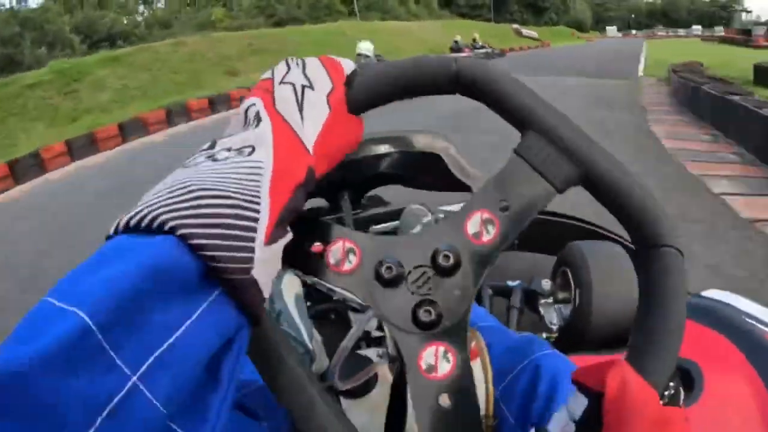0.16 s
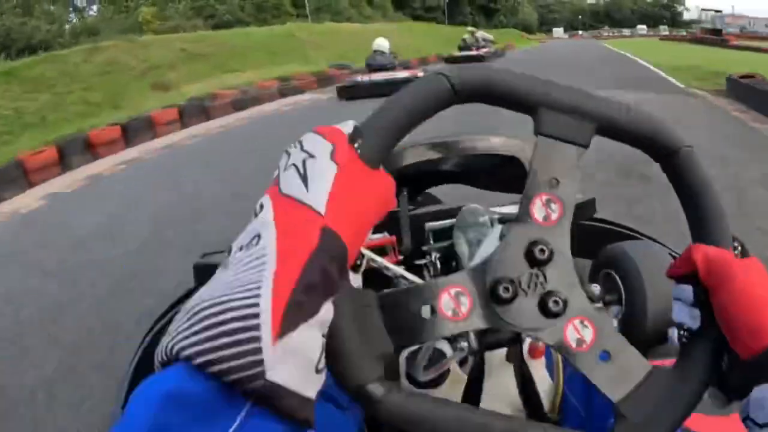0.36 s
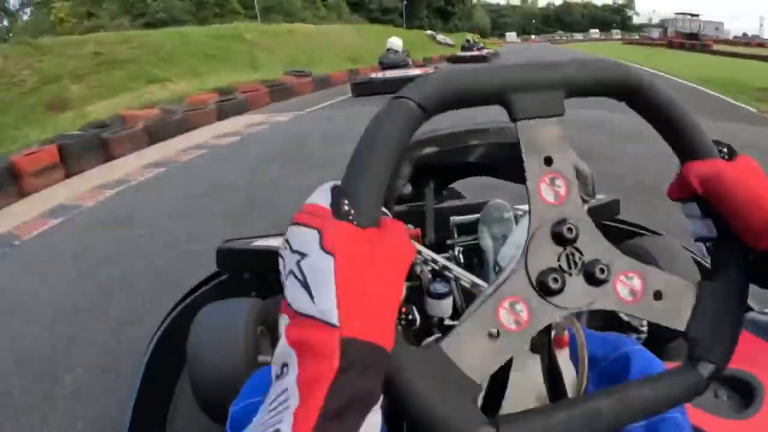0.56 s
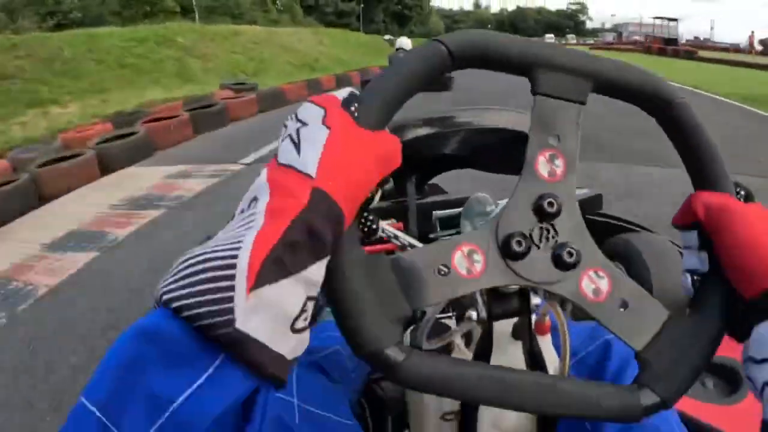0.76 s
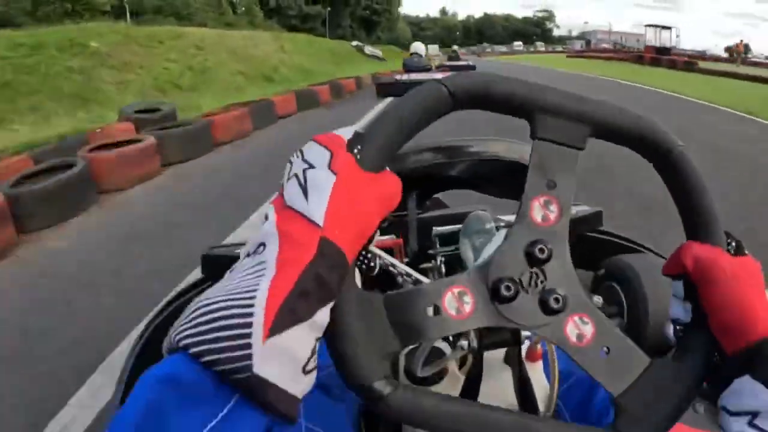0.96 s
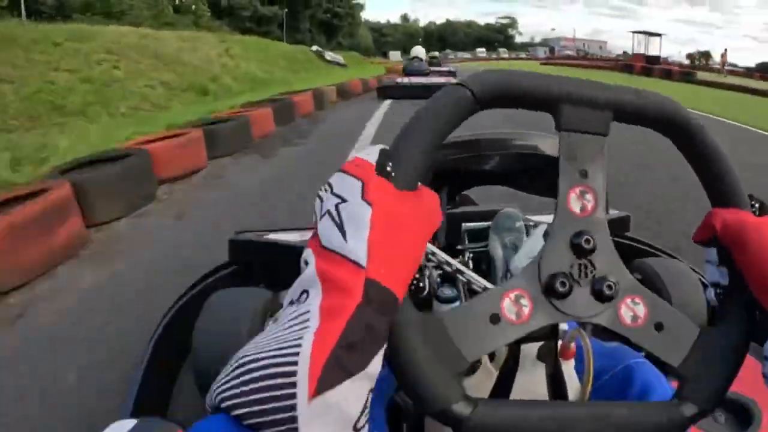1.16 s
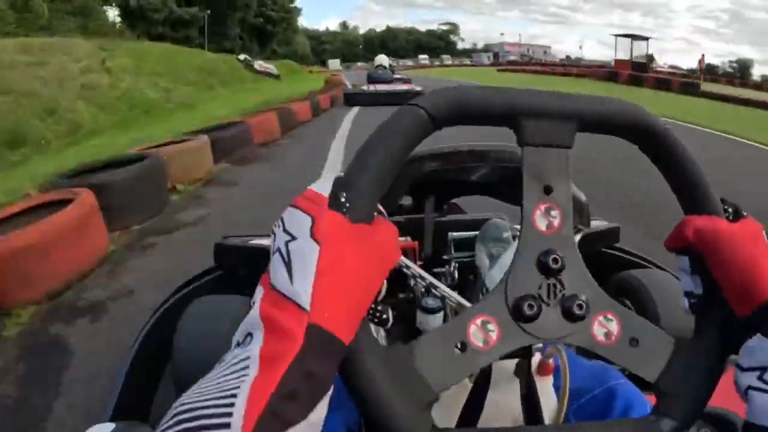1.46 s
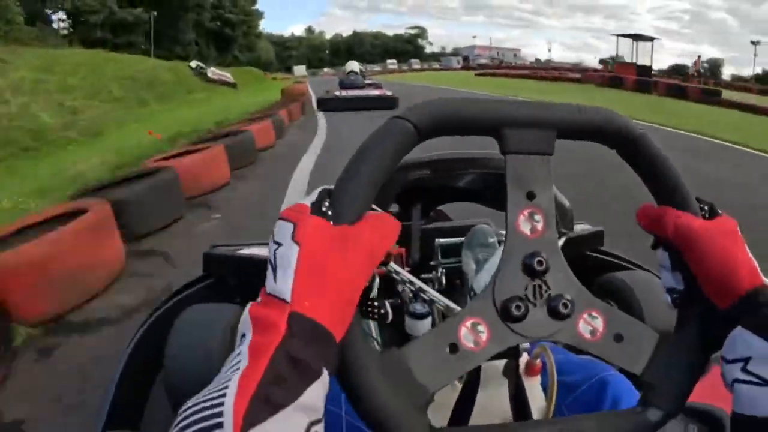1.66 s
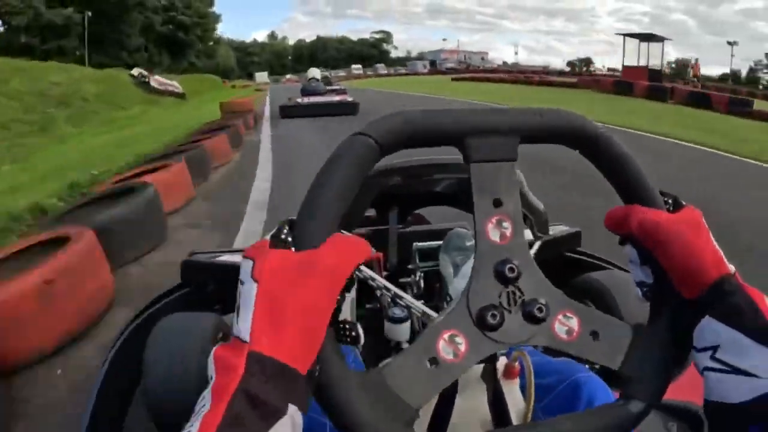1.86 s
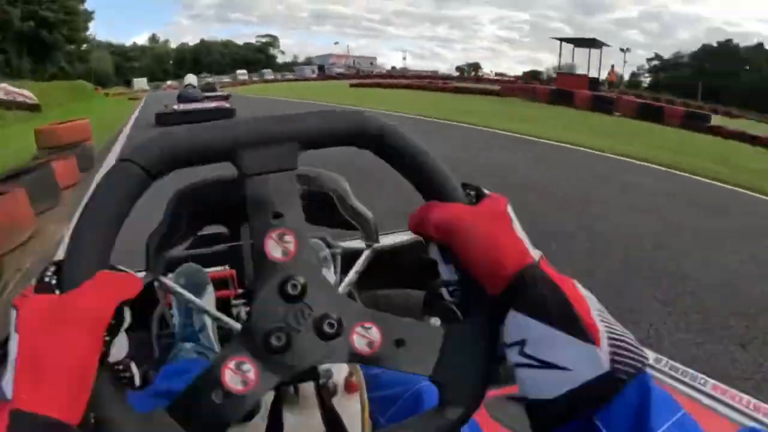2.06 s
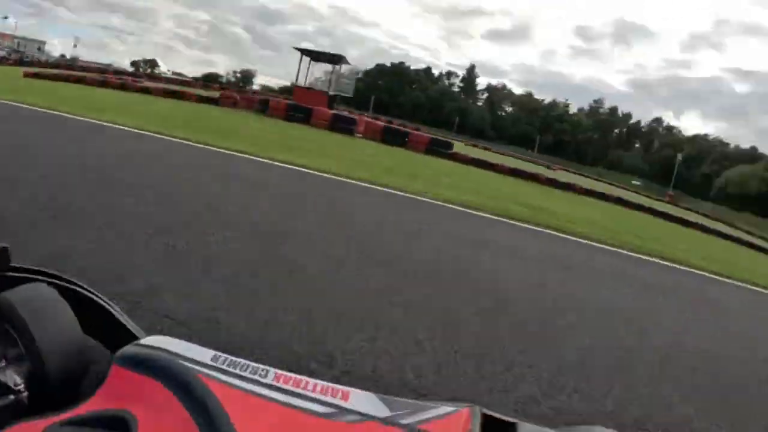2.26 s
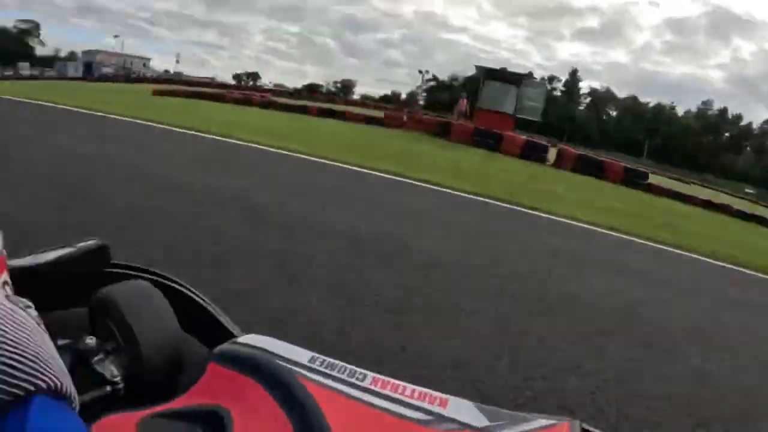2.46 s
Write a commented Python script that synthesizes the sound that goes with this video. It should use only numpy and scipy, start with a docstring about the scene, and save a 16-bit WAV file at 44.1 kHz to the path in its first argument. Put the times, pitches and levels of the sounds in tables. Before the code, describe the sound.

A small single-cylinder kart engine drones roughly from the driver's seat, with chain whirr and rattles.

```python
"""A single-cylinder four-stroke kart heard from the seat: speed hunts through a bend, climbs on the straight.
Each firing is a bark with a puff of gas, then a thump: partials locked to the cycle, plus gated noise.
The chain whirrs as tones in step with the engine; wind, rumble, hiss and tyre scrub are coloured noise.
The suit swishes as gliding noise bands, the bodywork rattles as decaying noise bursts, and the air
buffets the microphone as low gliding swings."""
import sys
import numpy as np
from scipy import signal
from scipy.fft import rfft, irfft
from scipy.io import wavfile
from scipy.ndimage import uniform_filter1d

SR = 44100
rng = np.random.default_rng(int(sys.argv[2]) if len(sys.argv) > 2 else 0)


def wav_record(signal):
    """Record a signal, one row per channel, as 16-bit PCM in the file named by sys.argv[1]."""
    frames = np.transpose(np.atleast_2d(signal))
    bounded = np.clip(frames, -1, 1)
    # unit amplitude maps onto the largest positive 16-bit level
    quanta = np.round(bounded * 32767).astype(np.int16)
    wavfile.write(sys.argv[1], SR, quanta)


N = 114660
TIME_S = np.arange(N) / SR

# Spectrum levels are relative: noise() scales each to unit rms.
# Engine speed. Each row: time in seconds, firings per second.
FIRING_RATE_HZ = [(0.0, 31.5), (0.073, 30.3), (0.241, 33.14), (0.306, 31.07), (0.428, 33.03),
                  (0.507, 30.75), (0.573, 32.84), (0.658, 29.81), (0.726, 32.05), (0.793, 29.77),
                  (0.912, 31.4), (0.977, 29.69), (1.032, 30.97), (1.218, 31.46), (1.262, 30.73),
                  (1.324, 31.55), (1.424, 30.62), (1.513, 31.89), (1.57, 31.15), (1.719, 31.44),
                  (1.838, 31.65), (1.99, 32.1), (2.095, 32.29), (2.241, 32.79), (2.427, 33.28),
                  (2.6, 33.45)]
# Exhaust partials before load, pipe and trim. Each row: multiple of the firing rate, level in dB.
THUMP_PARTIALS = [(2, -39.5), (3, -47), (4, -45), (5, -46), (6, -42), (7, -44), (8, -49), (9, -55),
                  (10, -53), (11, -51.5), (12, -46.3)]
BARK_PARTIALS = [(13, -52), (14, -53.5), (15, -46.5), (16, -54.5), (17, -55), (18, -58), (19, -62),
                 (20, -61)]
# Exhaust pipe resonances and notches. Each row: centre in Hz, half width in Hz, lift in dB.
PIPE_MODES = [(184.5, 9.6, 4), (202, 4, -7), (229, 7, 3), (365, 22, 3.5), (386, 6, 3), (402, 9, -10),
              (494, 16, 4)]
# Exhaust pulse strength with load. Each row: time in seconds, gain in dB.
LOAD_DB = [(0, -0.5), (.35, 2.5), (.8, 0.5), (1.2, 1.5), (1.8, 1.7), (2.3, 1.4), (2.6, -0.5)]
# Gas rush spectrum. Each row: frequency in Hz, density in dB per Hz.
PUFF_SPECTRUM = [(100, -20.5), (200, -1.5), (330, 1.5), (450, -4.5), (560, -7), (750, -11.5), (1500, -36)]
THUMP_AT_CYCLE, BARK_AT_CYCLE, PUFF_AT_CYCLE = 0.97, 0.906, 0.88
THUMP_TRIM_DB, BARK_TRIM_DB, PUFF_DB = 0.3, 0, -48
THUMP_ROUGH_DB, BARK_ROUGH_DB, WAVER_DB = 0.4, 0.7, 0.4
PUFF_WIDTH_CYCLES = 0.085

# Main chain mesh tone with tension. Each row: time in seconds, level in dB.
MESH_LEVEL_DB = [(0, -45.5), (.26, -45), (.37, -53), (.48, -45), (.63, -44), (.76, -48), (.94, -43.5),
                 (1.03, -49), (1.25, -44.5), (1.5, -45), (1.72, -43.5), (1.88, -50), (2.1, -55),
                 (2.31, -41.5), (2.45, -48), (2.6, -50)]
# Mesh sidebands, and the buzz an octave above. Each row: multiple of the firing rate, level in dB.
SIDEBANDS = [(25, -54), (26, -59.5), (27, -54), (29, -53), (30, -52), (31, -58.5)]
OCTAVE_LINES = [(52, -65), (53, -66), (54, -66), (55, -60.5), (56, -57.5), (57, -65)]
# Gains on the sidebands and on the buzz. Each row: time in seconds, gain in dB.
SIDEBAND_GAIN_DB = [(0, -3.5), (.5, -1.5), (.9, 1.5), (1.4, -0.5), (1.75, 1.5), (2.1, -2), (2.3, 4.5),
                    (2.47, 5.5), (2.6, 2.5)]
OCTAVE_GAIN_DB = [(0, -3), (.7, -.5), (1.8, 1), (2.05, 0), (2.25, -7), (2.6, -7)]
MESH_ORDER = 28
CHAIN_SLIP_RAD, CHAIN_OWN_SLIP_RAD, CHAIN_SLIP_HZ = 0.2, 0.6, 5

# Spectra of air on the microphone, frame rumble, rolling and mechanical hiss, tyre scrub.
# Each row: frequency in Hz, density in dB per Hz.
WIND_SPECTRUM = [(15, -4), (25, -5), (55, -3), (85, -3), (120, -6.5), (190, -2.5), (240, -8), (290, -14),
                 (450, -37)]
RUMBLE_SPECTRUM = [(150, -12.5), (290, -3), (380, 1.5), (500, -3), (690, -9.5), (880, -7.5), (1100, -14.5),
                   (1600, -22), (3000, -38.5)]
HISS_SPECTRUM = [(500, -7.5), (1000, 1.5), (1400, 2), (1750, -1), (2000, -5), (2300, -4.5), (2600, -17),
                 (3800, -12), (4400, -21), (4800, -16), (5500, -22), (6700, -25.5), (7500, -21),
                 (8500, -24.5), (9500, -34), (11500, -40), (13500, -47)]
SCRUB_SPECTRUM = [(600, -28), (1200, 0.5), (2000, -2), (3200, -5.5), (4500, -13), (8000, -23.5),
                  (10000, -33.5), (13000, -46.5)]
# Levels of wind, rumble and scrub. Each row: time in seconds, level in dB.
WIND_LEVEL_DB = [(0, -32), (.3, -33.5), (.55, -34), (.9, -34), (1.15, -33), (1.5, -35), (1.58, -37),
                 (1.7, -37), (1.85, -34), (1.93, -39), (2.15, -36.5), (2.35, -32.5), (2.46, -33.5),
                 (2.6, -37.5)]
RUMBLE_LEVEL_DB = [(0, -36.5), (.2, -36), (.6, -41.5), (1.2, -37.5), (1.48, -39.5), (1.7, -38.5),
                   (2.15, -40), (2.35, -36), (2.6, -37.5)]
SCRUB_LEVEL_DB = [(0, -42), (.06, -58.5), (.11, -48.5), (.17, -49), (.21, -52.5), (.28, -49.5), (.33, -53),
                  (.39, -53.5), (.48, -51), (.56, -56), (.64, -50), (.73, -57), (.88, -52), (1.0, -58),
                  (1.08, -53.5), (1.2, -54), (1.27, -60.5), (1.52, -53), (1.6, -57), (2.1, -57),
                  (2.34, -55.5), (2.395, -52.5), (2.425, -58), (2.5, -54.5), (2.55, -53), (2.6, -56)]
HISS_DB = -50.5

# Suit swishes. Each row: centre in seconds, level in dB, frequency in Hz, glide in Hz per second,
# Gaussian width in seconds, half bandwidth in Hz.
SWISHES = [(.025, -64.5, 7400, -5, 0.037, 900), (.107, -52.5, 2775, -5000, 0.043, 600),
           (.165, -48.5, 1600, -6000, 0.028, 450), (.265, -63, 6000, 0, 0.023, 1600),
           (.295, -55.5, 3200, 0, 0.023, 554), (0.476, -50, 2113, 12000, .02, 900),
           (2.395, -47, 2850, 30000, 0.011, 700), (2.544, -49.5, 2500, 15002, 0.017, 800)]
SWISH_RASP_DB, SWISH_RASP_HZ = 1.7, 160

# Bodywork knocks. Each row: start in seconds, level in dB, 60 dB ring time in seconds,
# brightness tilt in dB per octave.
KNOCKS = [(0.175, -44, .025, -2), (.184, -37, 0.025, -3.5), (0.495, -42, 0.021, 1), (.946, -44, .03, -9),
          (1.199, -51.5, .04, 10.5), (1.458, -56, .035, 12), (2.058, -39.5, .035, -8),
          (2.179, -37.5, .05, -8), (2.433, -40, .018, 4), (2.445, -29.5, .016, -6), (2.452, -39, 0.03, -1),
          (2.484, -42, .025, -3)]
# Knock spectrum before tilt. Each row: frequency in Hz, density in dB per Hz.
KNOCK_SPECTRUM = [(300, -19.5), (800, -3), (1600, 5), (2600, 0.5), (4500, -10.5), (8000, -30.5),
                  (10000, -39), (13000, -65)]
KNOCK_ATTACK_S = 0.0008

# Air buffets. Each row: centre in seconds, level in dB, frequency in Hz, glide in Hz per second,
# Gaussian width in seconds.
BUFFETS = [(1.29, -28.5, 41.7, -6, 0.033), (1.48, -22.5, 52, 1, 0.019), (1.27, -33.5, 142, -450, 0.046),
           (1.5, -38, 139.5, -400, 0.049), (1.66, -29.5, 113.3, -300, 0.035),
           (2.03, -33, 140.3, -500, 0.055), (2.35, -32, 90.3, 194, 0.057)]

STOPBAND_HZ, FADE_S, CEILING = 13700, 0.003, 0.14


def from_db(db):
    """Decibels to gain."""
    return 10 ** (np.asarray(db) / 20)


def rms_one(x):
    """Scale to unit rms."""
    return x / np.sqrt(np.mean(x ** 2) + 1e-20)


def in_time(rows):
    """Join (seconds, value) rows by straight lines."""
    return np.interp(TIME_S, *np.transpose(rows))


def drift(rate_hz):
    """Slow random wander of unit rms: two-pole lowpassed noise, computed every 40 samples."""
    step = 40
    pole = np.exp(-2 * np.pi * rate_hz * step / SR)
    white = rng.standard_normal(N // step + 2002)
    slow = signal.lfilter([1], [1, -2 * pole, pole * pole], white)[2000:]  # drop the settling
    return np.interp(np.arange(N) / step, np.arange(len(slow)), rms_one(slow))


def noise(spectrum):
    """Unit-rms noise of the given colour, falling 12 dB per octave beyond both ends."""
    hz, db = np.transpose(spectrum)
    f = np.maximum(np.fft.rfftfreq(N, 1 / SR), 1)
    colour = from_db(np.interp(np.log(f), np.log(hz), db))
    skirts = np.minimum(1, np.minimum(f / hz[0], hz[-1] / f)) ** 2
    return rms_one(irfft(rfft(rng.standard_normal(N)) * colour * skirts, N))


def pulses(turns, rate_hz, partials, rough_db):
    """One pressure dip per cycle, each of its own strength; partials waver and swell on pipe resonances."""
    cycle = np.floor(turns + 0.5).astype(int) + 2
    strength = from_db(rough_db * rng.standard_normal(size=128)[cycle])
    wave = 0
    for order, db in partials:
        pipe_db = sum(lift_db / (1 + ((order * rate_hz - hz) / half_width_hz) ** 2)
                      for hz, half_width_hz, lift_db in PIPE_MODES)
        gain = from_db(db + pipe_db + WAVER_DB * drift(0.77))
        wave = wave + gain * np.cos(2 * np.pi * round(order) * turns)
    return -np.sqrt(2) * wave * uniform_filter1d(strength, size=256)  # no steps between cycles


def engine(turns, rate_hz):
    """Every firing: a bark with a puff of gas, then the low thump, all scaled by load."""
    thump = pulses(turns - THUMP_AT_CYCLE, rate_hz, THUMP_PARTIALS, THUMP_ROUGH_DB)
    bark = pulses(turns - BARK_AT_CYCLE, rate_hz, BARK_PARTIALS, BARK_ROUGH_DB)
    from_puff_cycles = (turns - PUFF_AT_CYCLE + 0.5) % 1 - 0.5
    valve = np.exp(-0.5 * (from_puff_cycles / PUFF_WIDTH_CYCLES) ** 2)
    puff = rms_one(valve * noise(PUFF_SPECTRUM))
    exhaust = from_db(THUMP_TRIM_DB) * thump + from_db(BARK_TRIM_DB) * bark + from_db(PUFF_DB) * puff
    return from_db(in_time(LOAD_DB)) * exhaust


def chain_lines(turns, lines, shared_slip_rad):
    """Tones in step with the engine; each phase follows the shared slip and a wander of its own."""
    out = 0
    for order, db in lines:
        phase = 2 * np.pi * (round(order) * turns + rng.random())
        own_slip_rad = CHAIN_OWN_SLIP_RAD * drift(CHAIN_SLIP_HZ)
        out = out + from_db(db) * np.cos(phase + shared_slip_rad + own_slip_rad)
    return out


def chain(turns):
    """Links meet the sprocket in step with the engine: a clear tone, wavering sidebands, an octave buzz."""
    slip_rad = CHAIN_SLIP_RAD * drift(CHAIN_SLIP_HZ)
    mesh = from_db(in_time(MESH_LEVEL_DB)) * np.cos(2 * np.pi * MESH_ORDER * turns + slip_rad)
    whirr = from_db(in_time(SIDEBAND_GAIN_DB)) * chain_lines(turns, SIDEBANDS, slip_rad)
    buzz = from_db(in_time(OCTAVE_GAIN_DB)) * chain_lines(turns, OCTAVE_LINES, 2 * slip_rad)
    flutter = from_db(0.7 * drift(12))
    return np.sqrt(2) * (mesh + whirr + buzz) * flutter


def rolling():
    """Wind, frame rumble, steady hiss and the grainy scrub of the tyres, as coloured noise."""
    wind = from_db(in_time(WIND_LEVEL_DB)) * noise(WIND_SPECTRUM)
    rumble = from_db(in_time(RUMBLE_LEVEL_DB)) * noise(RUMBLE_SPECTRUM)
    hiss = from_db(HISS_DB + 0.6 * drift(20)) * noise(HISS_SPECTRUM)
    scrub = from_db(in_time(SCRUB_LEVEL_DB) + 0.9 * drift(67)) * noise(SCRUB_SPECTRUM)
    return wind + rumble + hiss + scrub


def sweep(centre_s, db, hz, glide_hz_per_s, width_s, wander_rad):
    """A gliding sine that swells and fades, its phase offset by the given wander."""
    t = TIME_S - centre_s
    swell = np.exp(-0.5 * (t / width_s) ** 2)
    return from_db(db) * swell * np.sin(2 * np.pi * (hz + glide_hz_per_s * t / 2) * t + wander_rad)


def swishes():
    """Cloth slides, catching and slipping: a rasping noise band that glides with the speed of the rub."""
    rasp = rms_one(from_db(SWISH_RASP_DB * drift(SWISH_RASP_HZ)))
    out = 0
    for *row, half_width_hz in SWISHES:
        # Low noise times a sine gives a band around the sine.
        low_noise = noise([(10, 0), (half_width_hz, 0), (2 * half_width_hz, -14)])
        out = out + low_noise * sweep(*row, 0)
    return np.sqrt(2) * rasp * out


def knocks():
    """Short dry rattles of the plastic bodywork: decaying noise; a harder contact is given a brighter tilt."""
    out = 0
    for start_s, db, ring_s, tilt_db in KNOCKS:
        t = TIME_S - start_s
        attack = np.clip(t / KNOCK_ATTACK_S, 0, 1)
        decay = from_db(db - 60 * np.maximum(t - KNOCK_ATTACK_S, 0) / ring_s)
        colour = [(hz, level_db + tilt_db * np.log2(hz)) for hz, level_db in KNOCK_SPECTRUM]
        out = out + attack * decay * noise(colour)
    return out


def buffets():
    """Eddies at the microphone: a few low swings each, unsteady by a 1 rad rms phase wander."""
    return sum(sweep(*row, drift(5.2)) for row in BUFFETS)


def scene():
    """Engine, chain, tyres, suit, bodywork and air at the driver's head."""
    rate_hz = in_time(FIRING_RATE_HZ)
    turns = np.cumsum(rate_hz) / SR  # one turn per firing cycle
    mix = engine(turns, rate_hz) + chain(turns) + rolling() + swishes() + knocks() + buffets()
    return mix[None]


def record(dry):
    """Round the peaks gently, ease the ends, cut the top."""
    ends = np.minimum(1, np.minimum(TIME_S, TIME_S[-1] - TIME_S) / FADE_S)
    rounded = CEILING * np.tanh(dry / CEILING)
    lowpass = signal.cheby2(12, 60, STOPBAND_HZ, fs=SR, output="sos")  # 60 dB down from here up
    return signal.sosfilt(lowpass, ends * rounded)


dry = scene()
out = record(dry)
wav_record(out)
```